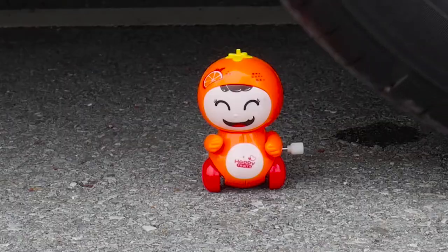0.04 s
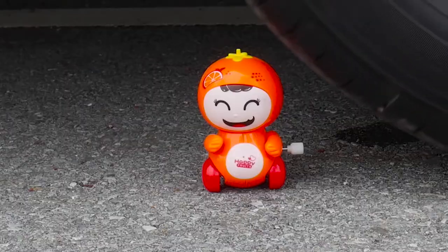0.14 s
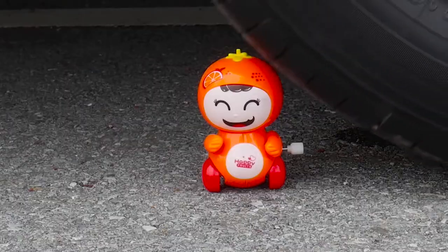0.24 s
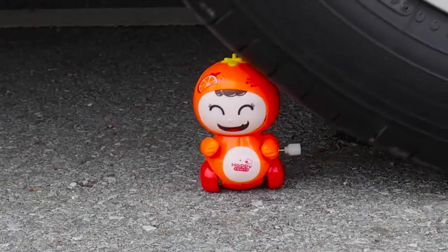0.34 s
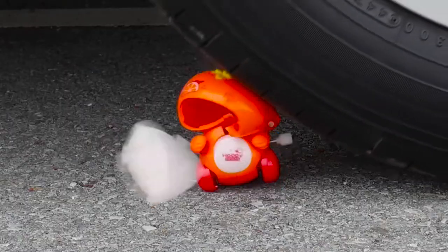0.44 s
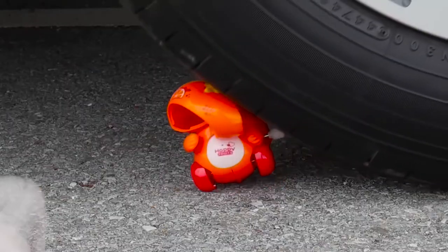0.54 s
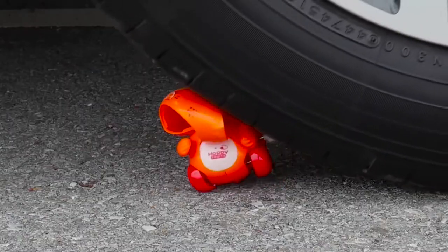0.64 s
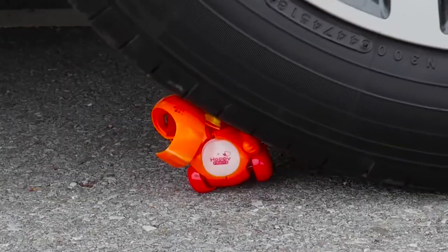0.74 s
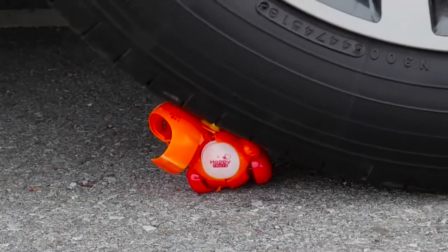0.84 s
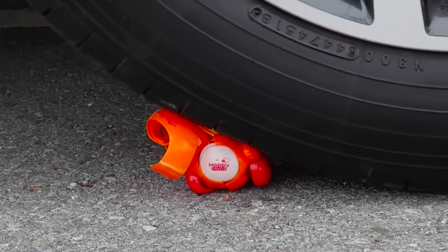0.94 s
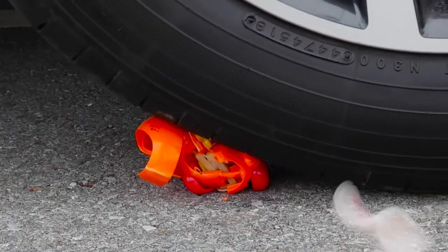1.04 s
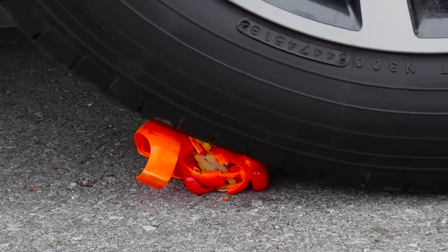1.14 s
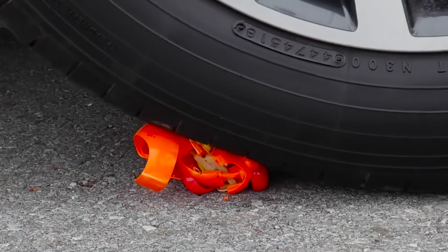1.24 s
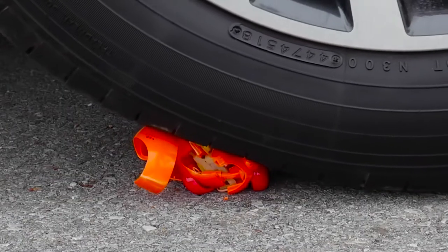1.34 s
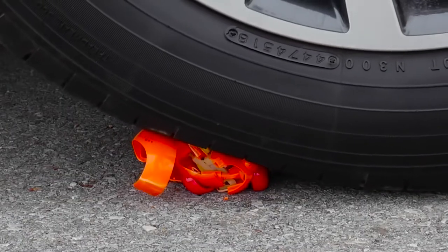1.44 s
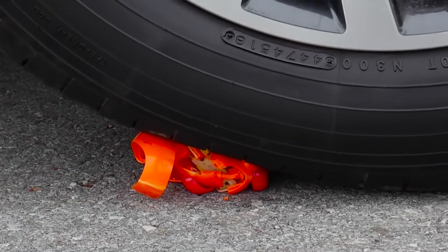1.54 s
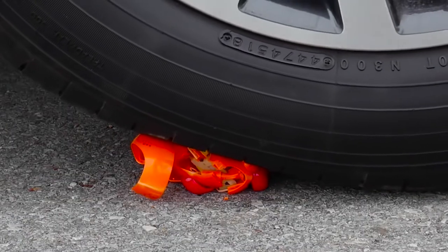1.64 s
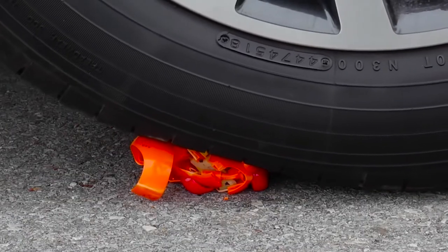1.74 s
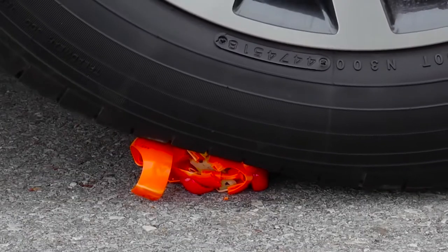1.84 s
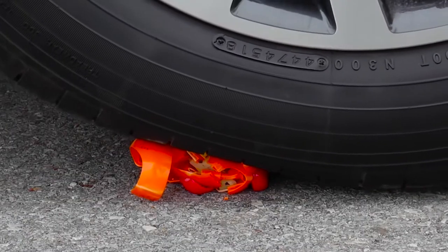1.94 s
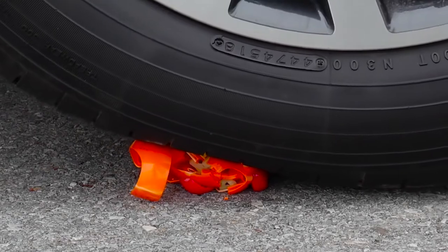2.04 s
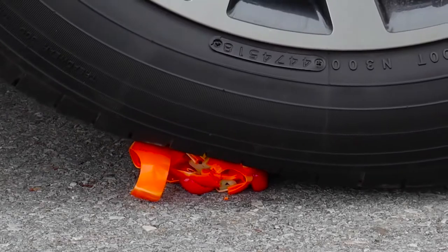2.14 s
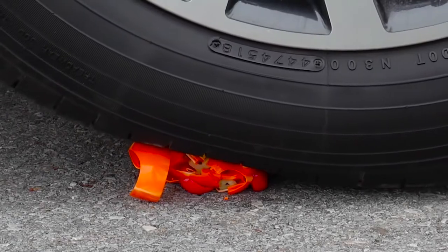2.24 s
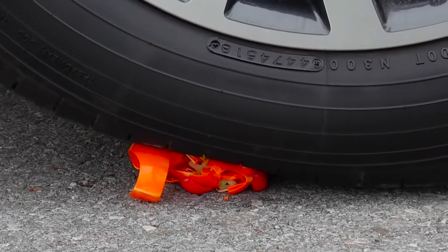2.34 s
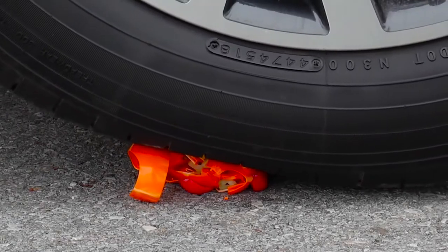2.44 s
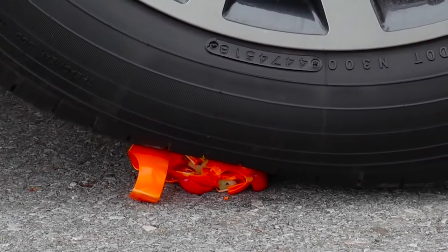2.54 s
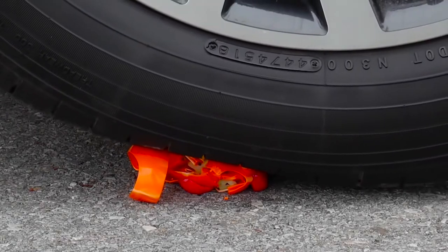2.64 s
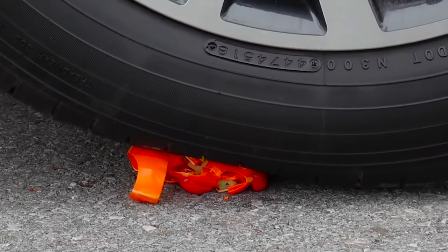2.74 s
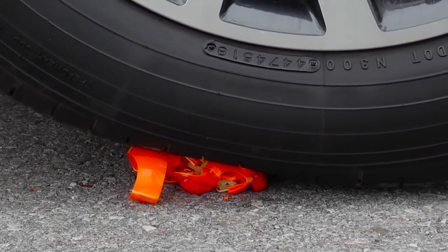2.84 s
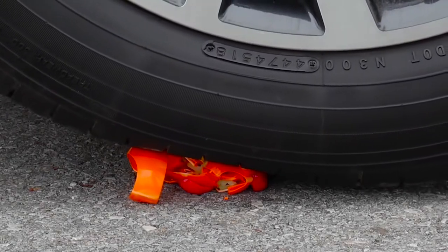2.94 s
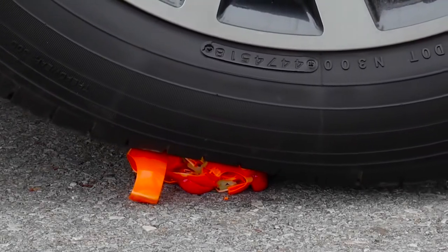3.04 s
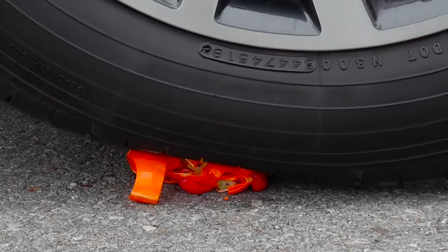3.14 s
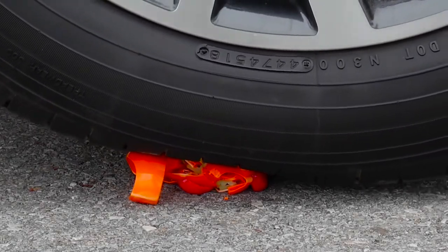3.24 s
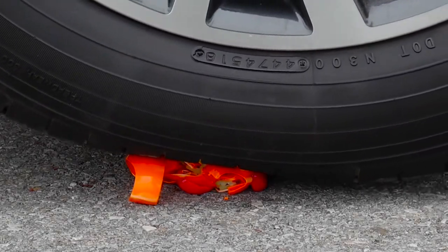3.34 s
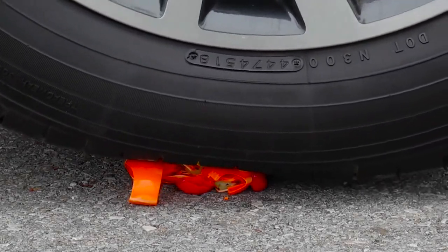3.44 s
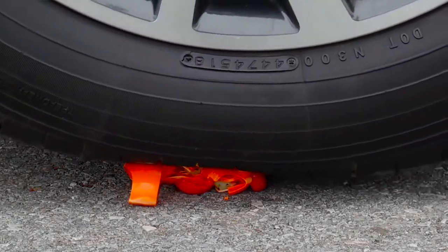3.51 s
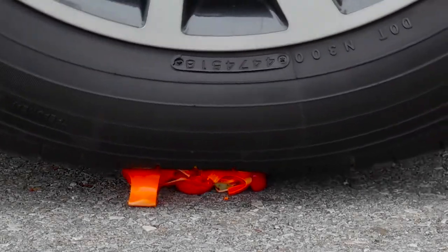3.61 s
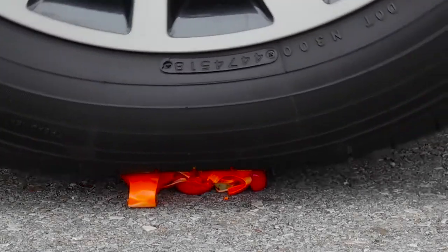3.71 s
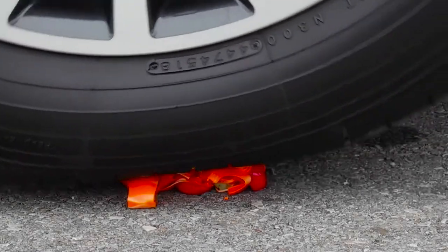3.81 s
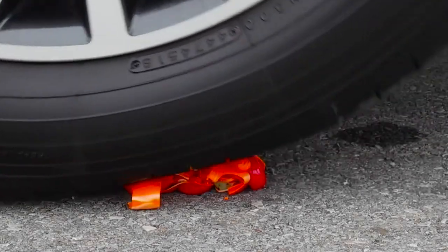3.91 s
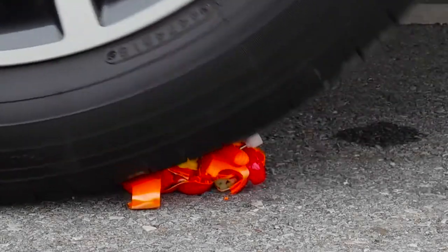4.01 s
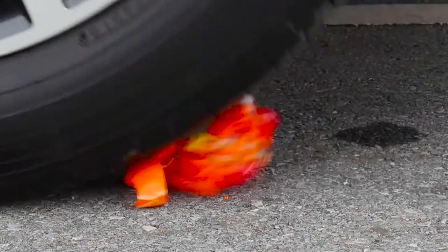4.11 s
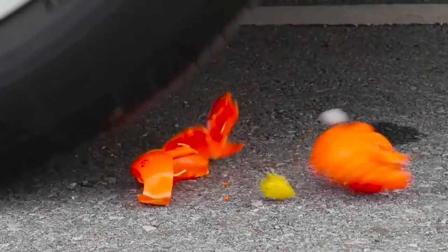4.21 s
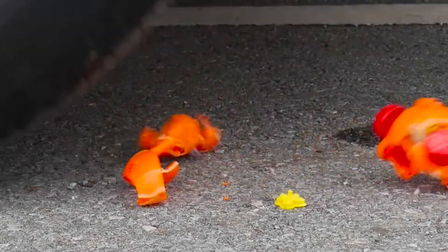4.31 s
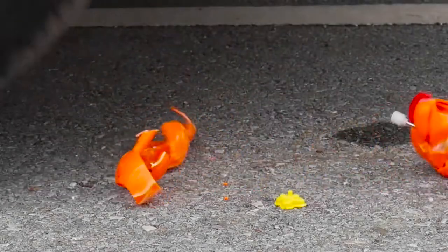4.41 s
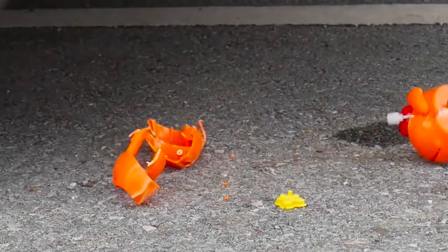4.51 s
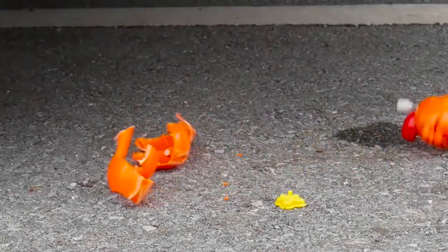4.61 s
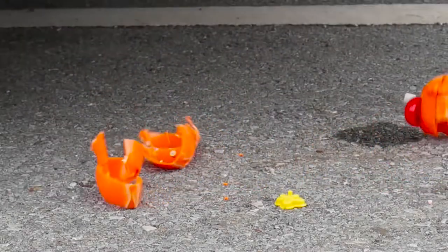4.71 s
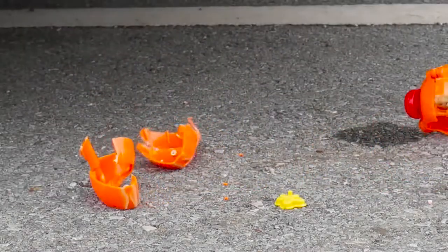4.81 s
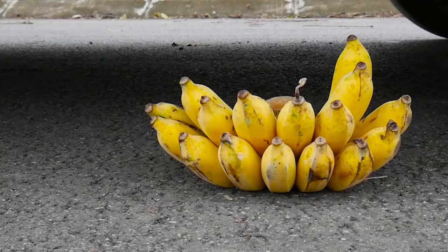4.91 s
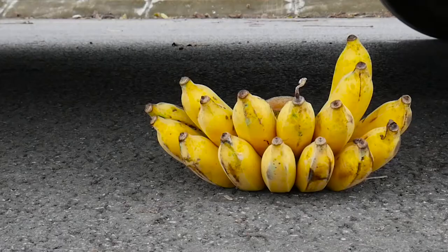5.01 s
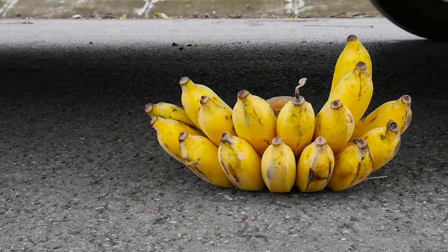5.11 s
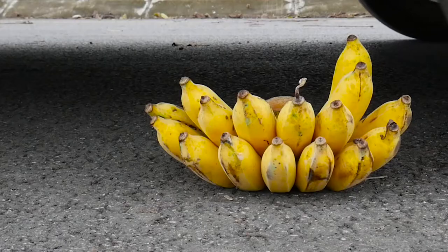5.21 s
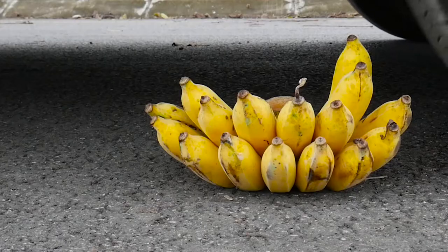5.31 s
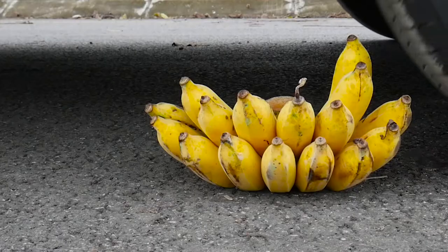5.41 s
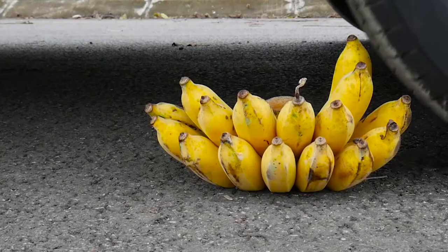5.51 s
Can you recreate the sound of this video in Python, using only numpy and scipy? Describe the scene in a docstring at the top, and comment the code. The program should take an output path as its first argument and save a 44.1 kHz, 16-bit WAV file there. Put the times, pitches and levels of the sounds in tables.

```python
"""Tyre over a hollow plastic toy

A car tyre rolls slowly over a plastic shell on asphalt, close by. Cracks are noise bursts that ring the shell's
modes, with brief echoes under the car; creaks are near-even slips, squeaks wavering sines. Grinding and skittering
shards are random grains through broad rings. The tyre's air hums as two sines over low rolling noise; the idling
car hisses behind as flickering noise bands with a faint tone, at a volume with abrupt steps."""
import sys
import numpy as np
from scipy import signal
from scipy.io import wavfile
from scipy.ndimage import uniform_filter1d

SR = 44100
rng = np.random.default_rng(int(sys.argv[2]) if len(sys.argv) > 2 else 0)


def unload_wav(signal):
    """Save mono or channel-first audio to the path in sys.argv[1] as 16-bit WAV at rate SR, clipped to [-1, 1]."""
    wavfile.write(
        sys.argv[1],
        SR,
        np.round(np.clip(np.atleast_2d(signal).T, -1, 1) * 32767).astype(np.int16),
    )


N = 245195
T_S = np.arange(N) / SR

# cracks and shard taps: (time [s], tearing time [ms], hollow [dB], wall [dB], rib [dB], splinter [dB],
# low ring [Hz], high ring [Hz])
CRACKS = [(0.352, 4.8, -63, -67, -43.5, -46, 740, 4700), (0.4173, 1.23, -15, -19, -6.5, 1.5, 690, 7086),
          (.435, 0.56, -29, -25, -36, -41, 790, 3500), (0.4731, 1, -8.5, -3.5, -0.5, 2, 1790, 3940),
          (0.4834, 0.14, -35, -5.5, 0, 5.5, 1810, 4130), (.49, 1.4, -38, -28, -6.5, -12.5, 1580, 5140),
          (0.505, 1.04, -18.5, -10, -13, -4.5, 1540, 10040), (0.519, 1.9, -48, -45, -23, -24, 1410, 4720),
          (0.524, 2, -49, -44, -33, -23, 2130, 7320), (0.5512, 1.3, -40, -17.5, -10.5, -6.5, 1290, 8800),
          (.5617, 0.36, -28, -16, -6.5, -6.5, 2070, 3900),
          (0.6246, 1.2, -45, -22, -17.5, -9.5, 2220, 10400), (.702, 1.6, -26, -13, -11.5, -11, 1600, 4180),
          (.7414, 2.9, -28, -32, -26, -18, 670, 4720), (0.7539, 4.1, -24, -41, -21, -28, 2550, 4500),
          (.762, 2.2, -18.5, -13, -2, -3, 2710, 4270), (0.8401, 0.73, -33, -23.5, -13.5, -16, 1590, 4300),
          (.858, 2.1, -24, -24.5, -20, -21, 620, 4390), (.91, 3.3, -55, -61, -40, -34.5, 370, 9900),
          (0.9998, 15, -36.5, -35, -30.5, -47, 1310, 6700),
          (1.0132, 0.43, -22.5, -35.5, -9, -2.5, 1000, 9830),
          (1.0203, 1.9, -40.5, -23, -16.5, -8, 2510, 9970), (1.027, 0.66, -28.5, -38, -11, -6, 1510, 9540),
          (1.047, .51, -36, -27, -21, -18.5, 2620, 8300), (1.0707, 1.8, -25, -21, -15.5, -7, 1660, 9740),
          (1.075, 1.07, -21, -2.5, 4.5, 3, 1950, 3910), (1.08, 1.2, -22.5, -26, -5, -6.5, 2050, 8750),
          (1.094, 1.2, -13, -23, -9.5, -6.5, 540, 4260), (1.102, 0.85, -34, -31, -15, -16, 560, 4570),
          (1.173, 2.5, -61, -70, -62, -40, 400, 8830), (1.1907, 3.2, -64, -66, -47, -33, 2140, 9100),
          (1.206, 5.5, -52, -47, -37, -35, 990, 4800), (1.216, 2.3, -28, -42, -25.5, -28, 540, 4380),
          (1.259, 0.17, -48, -58, -17.5, -19, 2720, 6000), (1.31, 3.5, -59, -67.5, -55, -39, 1090, 9150),
          (1.3636, 5.2, -48, -45.5, -50, -20.5, 760, 12000),
          (1.45, 6.4, -53.5, -44.5, -34.5, -29.5, 970, 9200), (1.47, 0.68, -24, -32, -5, -12.5, 580, 4400),
          (1.481, 0.16, -32.5, -27.5, -27.5, -34.5, 1110, 4430),
          (1.5, 2.4, -52.5, -47, -46.5, -29, 610, 10800), (1.521, 3, -52, -52, -44, -40, 800, 6800),
          (1.6054, 2.4, -49, -52, -41.5, -40, 720, 6330), (1.6744, 3.1, -48, -52, -41, -51, 745, 3500),
          (1.6985, 0.81, -34.5, -30.5, -10.5, -6, 560, 10700),
          (1.8797, 1.16, -46, -37, -23.5, -11.5, 750, 10900),
          (2.1478, .79, -15.5, -21, -10.5, -1.5, 570, 11200),
          (2.216, 0.86, -67, -61.5, -60, -42.5, 791, 11600),
          (2.2323, 0.37, -29, -23, -7.5, -11, 2710, 5070), (2.5, 1.3, -64, -56.5, -58.5, -50.5, 1300, 9260),
          (2.8182, 1.24, -12, -10.5, -5.5, -5.5, 480, 4230),
          (3.4251, 1.37, -20, -25, -18.5, -4.5, 550, 9450), (3.44, 3.2, -32, -38, -49, -46, 810, 4630),
          (3.4656, 0.7, -29.5, -27, -16.5, -3, 570, 11100), (3.5312, 0.5, -12, -23.5, -8, -10, 550, 7040),
          (3.638, 0.81, -11, -9.5, -0.5, -1.5, 800, 4330),
          (3.6563, 0.39, -15.5, -28, -12.5, -18, 800, 10300),
          (3.6753, 0.36, -31.5, -26.5, -38, -9.5, 550, 6290),
          (3.6866, .7, -18.5, -35, -20.5, -39, 760, 4600),
          (3.693, .88, -19.5, -48, -14.5, -11.5, 800, 10000), (3.708, 0.83, -35, -35, -26, -13, 570, 7250),
          (3.7161, 0.84, -14.5, -24.5, -22, -23, 800, 8910), (3.7479, 1.33, -8, -21, -4, -5.5, 820, 4520),
          (3.7666, 0.25, -31, -55, -18, -12.5, 700, 7990), (3.7866, 1, -24, -29, -17.5, -21.5, 790, 4850),
          (3.8215, 0.52, -24.5, -33, -24.5, -15.5, 790, 8500),
          (3.8554, 0.84, -10, -21.5, -7, -5.5, 760, 7980),
          (3.8995, 0.14, -25, -45.5, -20.5, -28, 800, 5060),
          (3.949, 0.67, -35.5, -33, -10.5, -10, 2570, 3630), (3.9585, 0.86, -8, -14, -6.5, -5, 550, 10830),
          (3.9718, 4.8, -34.5, -45, -29, -37.5, 530, 4820),
          (4.0198, 2.2, -46.5, -60.5, -52.5, -26, 590, 12700), (4.0536, 0.5, -48, -53, -36, -36, 670, 7040),
          (4.0743, 0.79, -48.5, -52, -38, -42, 780, 5000), (4.0876, 0.2, -29.5, -41.5, -46, -10, 760, 9400),
          (4.1046, 4.3, -33.5, -38, -18.5, -16.5, 1020, 10200),
          (4.112, 1.9, -29, -27.5, -31, -28.5, 970, 5000),
          (4.1235, 0.4, -47, -36.5, -25.5, -22.5, 2530, 3700),
          (4.1314, 0.35, -38.5, -38, -24.5, -29, 2800, 5050),
          (4.1368, 0.46, -52, -46, -32, -19.5, 2670, 9600), (4.152, 0.9, -58, -41, -42, -41, 1580, 9000),
          (4.1665, 0.79, -33.5, -31, -10.5, -13.5, 2670, 6500),
          (4.174, 0.98, -52, -25, -17.5, -32, 2380, 6550), (4.1832, 0.78, -31, -32, -13, -18, 2560, 5100),
          (4.19, 5.2, -22.5, -23, -9, -10, 1860, 4600), (4.2062, 1.9, -50, -30, -16, -13.5, 930, 10570),
          (4.265, 4.4, -53.5, -45.5, -26, -24.5, 2580, 3830),
          (4.2933, 3.3, -56, -58, -30, -26, 1870, 10830), (4.3063, 1.3, -55, -48, -25.5, -19.5, 1850, 9860),
          (4.3198, 7, -44, -59, -36, -27, 790, 9410), (4.344, 10, -56, -41, -26, -27, 2800, 7400),
          (4.358, 1.5, -57, -50, -28, -28, 2470, 4080), (4.3789, 6.6, -64, -61, -26, -28, 2280, 3850),
          (4.4135, 4.1, -42.5, -44, -40, -29, 860, 9100), (4.431, 4.5, -56, -39, -26.5, -27.5, 1780, 4100),
          (4.4822, 3.3, -45.5, -44, -27, -35, 2650, 3920), (4.4999, 0.82, -59.5, -48, -46, -28, 2640, 9000),
          (4.5085, 3.5, -46, -46, -25, -23, 2680, 3390), (4.549, 6, -52.5, -71.5, -32.5, -33.5, 2760, 6540),
          (4.5866, 8.1, -50.5, -49, -30.5, -30, 2440, 7300),
          (4.6728, 1.2, -50.5, -52, -37, -34.5, 450, 11530), (4.7375, 2.7, -67, -68, -45.5, -53, 420, 3680)]
# echo under the car against the direct sound: hollow, wall, rib, splinter [dB]
ECHO_DB = [-9.5, -10, -14.5, -16.5]
# modes of each shell part: (frequency [Hz], 60 dB decay time [ms], relative level [dB])
HOLLOW_MODES = [(380, 1.4, -7), (583, 39, -3), (799, 11, 16.5), (980, 14, 11)]
WALL_MODES = [(1520, 8.7, 7.5), (1820, 9.2, 11.5), (2071, 7.2, 15), (2500, 6, -16.5)]
RIB_MODES = [(3750, 3.7, -23), (4207, 9, -0.5), (4868, 8.2, 4.5), (5322, 8.2, 1), (6525, 10, 3)]
SPLINTER_MODES = [(7530, 4.3, 5), (7870, 1, -5.5), (9140, 3.4, 3.5), (10196, 4.6, 4.5), (11060, 2.6, 6),
                  (11780, 3.6, 1.6), (15000, 1.5, 2.5), (15000, 0.85, -2)]
# limits of the four parts' bands: (frequency [Hz])
PART_EDGES_HZ = [250, 1200, 3000, 7000, 16000]
# stick-slip of shell on rubber: (time [s], slip rate [Hz], level [dB], top ring over the others [dB])
CREAK = [(.64, 164, -47, 6), (.655, 168.5, -51, -4), (.685, 200.8, -42.5, 10), (.71, 292, -33, -12),
         (.74, 285, -28.5, -15), (.758, 279, -20, -6), (.77, 290, -49.5, -4)]
# a pinched piece sings: (start [s], frequency [Hz], length [ms], level [dB])
SQUEAKS = [(1.362, 3600, 22, -40), (1.364, 12200, 26, -48)]
# continuous grinding under the tyre that rises and falls: (time [s], level [dB])
GRIND = [(.33, -72.5), (.41, -45), (.62, -43), (.82, -50.5), (.99, -58.5), (1.4, -57), (1.85, -58),
         (2.0, -74.5), (3.33, -72), (3.42, -49.5), (3.58, -65), (3.64, -41), (4.0, -54.5), (4.3, -66),
         (4.6, -54.5), (4.77, -69), (4.9, -78)]
# shell or shard slides: (start [s], hold [s], level [dB], treble over mids [dB])
SCRAPES = [(0.56, 0.018, -42.5, 6), (0.644, 0.093, -31.5, -6), (1.085, 0.02, -30, -1),
           (1.468, 0.085, -62, -5), (2.135, 0.062, -51.5, -17), (2.81, 0.04, -43, -19.5),
           (3.393, 0.05, -47, -33), (3.84, 0.017, -52, 10), (4.108, 0.013, -36.5, -12),
           (4.182, 0.019, -26, -13), (4.276, 0.03, -49, -12), (4.348, 0.041, -42.5, -4),
           (4.426, 0.019, -51, -8), (4.51, 0.023, -45.5, -2)]
# tyre air hums as the rubber flexes: (time at full level [s], hold [s], hum [dB], overtone over hum [dB])
TYRE_HUMS = [(.68, 0.07, -47, -11), (.9, 0.12, -42.5, -25), (1.1, 0.031, -48, -4), (1.25, .2, -51, -21.5),
             (2.87, 0.16, -59.5, -26.5), (3.55, .1, -51.5, -12), (3.8, 0.081, -49, -13.5),
             (4.04, 0.17, -49.5, -10)]
# low rolling noise: (time [s], level [dB])
RUMBLE = [(0, -92), (.4, -70.5), (1.9, -66), (2.0, -79), (2.8, -76), (3.0, -64.5), (4.2, -62), (4.65, -63),
          (4.75, -74.5), (4.93, -75.5), (4.97, -63), (5.56, -65)]
# body lurches: (time at full level [s], level [dB])
LURCHES = [(.56, -45.5), (0.848, -50.5), (1.12, -53), (3.45, -51)]
# background noise level, with abrupt volume edits: (time [s], level [dB])
BACKGROUND_LEVEL = [(0, -57.5), (.33, -59.5), (.36, -45), (1.2, -54), (1.6, -49.5), (1.89, -46.5),
                    (1.92, -57), (2.24, -48.5), (2.28, -61), (3.35, -50.5), (3.6, -43.5), (4.3, -56),
                    (4.66, -52.5), (4.72, -65), (4.93, -64), (4.96, -55), (5.56, -55.5)]
# background spectrum: (frequency [Hz], relative level per Hz [dB])
CAR_SPECTRUM = [(25, -18.5), (60, -8.5), (120, -1.5), (300, -9), (550, -2), (900, -6), (1500, -13.5),
                (2400, -16), (4500, -23), (9000, -23.5), (16000, -32)]
# body resonances: (frequency [Hz], width [Hz], level over the wide noise [dB])
CAR_PEAKS = [(610, 26, -16.5), (745, 31, -14), (795, 140, -11), (1148, 250, -6.5), (1595, 20, -14),
             (3280, 750, -6.5)]
# faint engine-bay tone: (time [s], frequency [Hz])
WHINE = [(0, 747), (1.2, 731), (1.75, 774.7), (5.56, 780.5)]

PINNED_S, PINNED_ECHO_DB = 1.65, -4  # shell pinned flat under the rubber: drier cracks
FREE_S = 4.23  # tyre has rolled off
LONG_ECHO_DB = 2.5  # per tenfold tearing time
SHOVE_DB, SHARP_SHOVE_DB = -20, -19  # shove of air, against the hollow and the wall
GRIND_TILT_DB = -11.5  # treble over mids
SCRAPE_RISE_DB_S, SCRAPE_FALL_DB_S = 900.5, 701.5
SKITTER_S, SKITTER_ENDS_S, SKITTER_PER_S = 4.233, 4.81, 270
SKITTER_DB, SKITTER_FALL_DB_S, TAP_SPREAD_DB = -43.5, 40, 4.5
TYRE_HZ, OVERTONE_HZ = 199, 396
HUM_RISE_DB_S, HUM_FALL_DB_S, HUM_FLICKER_DB = 199.5, 60, 2.6
LURCH_RISE_DB_S, LURCH_FALL_DB_S = 95.5, 135
WHINE_FLICKER_DB, WHINE_ENDS_S = 2.5, 4.7
TOP_HZ = 16300


def undb(db):
    """Decibels to amplitude ratio."""
    return 10 ** (np.asarray(db) / 20)


def unit(x):
    """Scale to an RMS of 1."""
    return x / np.sqrt(np.mean(x ** 2))


def curve(table):
    """Columns after the time, interpolated to one value a sample."""
    s, *columns = np.transpose(table)
    return [np.interp(T_S, s, column) for column in columns]


def band(x, hz, width_hz):
    """Single resonance."""
    return signal.lfilter(*signal.iirpeak(hz, hz / width_hz, SR), x)


def walk(rate_hz):
    """Random normal levels, rate_hz a second, joined by straight slopes."""
    hold = int(SR / rate_hz)
    levels = rng.standard_normal(N // hold + 1)
    return uniform_filter1d(np.repeat(levels, hold), hold)[:N]


def swell(s, hold_s, db, rise_db_s, fall_db_s):
    """Gain that climbs to its level, holds and dies away."""
    t = T_S - s
    return undb(db - rise_db_s * np.maximum(-t, 0) - fall_db_s * np.maximum(t - hold_s, 0))


def ring(modes, t):
    """Sum of exponentially decaying modes."""
    hz, t60_ms, db = np.transpose(modes)[:, :, None]
    decay = 10 ** (-3000 * t / t60_ms)
    return np.sum(undb(db) * np.sin(2 * np.pi * hz * t) * decay, axis=0)


def part_modes(modes, shake, edge, own):
    """One part's modes, randomly shifted for a crack, plus the broken piece's rings in its band."""
    shaken = [(hz * (1 + 0.053 * a), t60_ms, db + b) for (hz, t60_ms, db), (a, b) in zip(modes, shake)]
    return shaken + [mode for mode in own if edge[0] <= mode[0] < edge[1]]


def cracks():
    """Each crack is a quick run of tiny tears that rings the shell's parts, then scatters under the car."""
    out, size = np.zeros(N + 8192), 6144
    t = np.arange(size) / SR
    parts = (HOLLOW_MODES, WALL_MODES, RIB_MODES, SPLINTER_MODES)
    edges = list(zip(PART_EDGES_HZ, PART_EDGES_HZ[1:]))
    filters = [signal.butter(2, edge, "bandpass", fs=SR, output="sos") for edge in edges]
    # echoes between road and floor pan: dense for a moment, then a faint tail
    tail = np.exp(-(t / 0.018) ** 1.5) + undb(-22.5) * 10 ** (-3 * t / 0.15)
    scatter = unit((1 - np.exp(-t / 0.006)) * tail)
    dull = signal.butter(1, 9000, fs=SR)  # rough asphalt swallows the top
    shove = unit(np.exp(-t / 0.0012) * np.sin(2 * np.pi * 80 * t))
    for s, tear_ms, *parts_db, low_hz, high_hz in CRACKS:
        tear_ms = max(tear_ms, 0.2)
        tears, echoes = rng.standard_normal((2, size))
        shakes = rng.standard_normal((4, 9, 2))
        tears = tears * np.abs(tears) ** 0.5  # uneven sizes
        tears = tears * np.exp(-(1000 * t / tear_ms) ** 0.95) * (1 - np.exp(-t / 0.00045))
        echoes = signal.lfilter(*dull, echoes)
        # a piece off the rubber rings longer
        own = [(low_hz, 16, 9), (high_hz, 14 if s > FREE_S else 8, 12)]
        sound = (undb(parts_db[0] + SHOVE_DB) + undb(parts_db[1] + SHARP_SHOVE_DB)) * shove
        wet_db = LONG_ECHO_DB * np.log10(tear_ms) + PINNED_ECHO_DB * (PINNED_S < s < FREE_S)
        for modes, edge, sos, db, echo_db, shake in zip(parts, edges, filters, parts_db, ECHO_DB, shakes):
            response = ring(part_modes(modes, shake, edge, own), t[:2048])
            rung = 0.7 * unit(signal.fftconvolve(tears[:1024], response))
            rung = np.pad(rung, (0, size - len(rung)))
            direct = unit(signal.sosfilt(sos, rung + 0.17 * unit(tears)))
            echo = unit(signal.sosfilt(sos, echoes)) * scatter
            sound = sound + undb(db) * (direct + undb(echo_db + wet_db) * echo)
        i = int(s * SR)
        out[i:i + size] += sound * np.sqrt(0.002 * SR / size)  # level is RMS as if spread over 2 ms
    return out[:N]


def creak():
    """Nearly even slips, each a short scratch in three rings of the bent shell."""
    slip_hz, db, tilt_db = curve(CREAK)
    phase = np.cumsum(slip_hz * (1 + 0.05 * walk(150)) / SR)
    slips = np.diff(np.floor(phase), prepend=0) * undb(1.5 * walk(200))
    scratch = signal.lfilter([1], [1, -np.exp(-1 / (0.0004 * SR))], slips)
    scratch = scratch * (1 + 0.6 * rng.standard_normal(N))
    rings = unit(band(scratch, 4730, 800) + 1.3 * band(scratch, 6500, 1000))
    rings = rings + undb(tilt_db) * unit(band(scratch, 11800, 3000))
    return rings * undb(db) * (T_S > CREAK[0][0]) * (T_S < CREAK[-1][0])


def squeak():
    """Short sines wavering in level and phase."""
    out = np.zeros(N)
    for s, hz, length_ms, db in SQUEAKS:
        tone = np.sin(2 * np.pi * hz * T_S + 0.72 * walk(192))
        arch = np.sin(np.pi * np.clip(1000 * (T_S - s) / length_ms, 0, 1) ** 0.72)
        out += undb(db + 2.7 * walk(300)) * tone * arch
    return out


def squeezed_shell(x, tilt_db):
    """Broad rings of the squeezed shell, damped by rubber."""
    mids = 0.5 * band(x, 1000, 840) + 0.38 * band(x, 2200, 2200) + band(x, 4000, 2100)
    treble = 1.4 * band(x, 6900, 2900) + band(band(x, 9700, 5000), 10000, 7000)
    return unit(mids) + undb(tilt_db) * unit(treble)


def grind():
    """Dense grains of uneven size over a noisy rub; scrapes stand out of it."""
    grains = (rng.random(N) < 2500 / SR) * undb(1.7 * rng.exponential(size=N)) * rng.choice([-1, 1], N)
    rub = 0.45 * rng.standard_normal(N)
    gains = [undb(curve(GRIND)[0]) * (T_S > GRIND[0][0])]
    gains += [swell(s, hold_s, db, SCRAPE_RISE_DB_S, SCRAPE_FALL_DB_S) for s, hold_s, db, _ in SCRAPES]
    total = sum(gains)
    # treble balance is weighted by the gain of each contact
    tilts = undb([GRIND_TILT_DB] + [row[-1] for row in SCRAPES])
    tilt_db = 20 * np.log10(tilts @ np.array(gains) / (total + 1e-9) + 1e-9)
    return squeezed_shell(unit(grains) + rub, tilt_db) * total * undb(3.5 * walk(110))


def skitter():
    """Random taps of small shards, each a brief bright rattle, fading as they roll off."""
    taps = (rng.random(N) < SKITTER_PER_S / SR) * undb(TAP_SPREAD_DB * rng.standard_normal(N))
    taps = taps * (T_S < SKITTER_ENDS_S)
    rattle = signal.lfilter([1], [1, -np.exp(-1 / (0.0017 * SR))], taps) * rng.standard_normal(N)
    bright = unit(band(rattle, 4100, 2600)) + 0.43 * unit(band(rattle, 9900, 5000))
    return bright * swell(SKITTER_S, 0.076, SKITTER_DB, SCRAPE_RISE_DB_S, SKITTER_FALL_DB_S)


def tyre():
    """The ring of air in the tyre hums with an overtone, wavering slightly."""
    hum = np.max([swell(s, hold_s, db, HUM_RISE_DB_S, HUM_FALL_DB_S)
                  for s, hold_s, db, _ in TYRE_HUMS], axis=0)
    overtone = np.max([swell(s, hold_s, db + over_db, HUM_RISE_DB_S, 2 * HUM_FALL_DB_S)
                       for s, hold_s, db, over_db in TYRE_HUMS], axis=0)
    waver = 2.9 * walk(11)
    out = np.zeros(N)
    for hz, gain, depth in ((TYRE_HZ, hum, 0.4), (OVERTONE_HZ, overtone, 0.8)):
        tone = np.sqrt(2) * np.sin(2 * np.pi * hz * T_S + waver * depth)
        out += tone * gain * undb(HUM_FLICKER_DB * walk(33))
    return out


def rumble():
    """Low rolling noise from tyre and body in two resonances, swelling at each lurch."""
    noise = rng.standard_normal(N)
    low = band(band(noise, 120, 77), 120, 77) + 0.19 * band(band(noise, 290, 150), 290, 150)
    lurch = sum(swell(s, 0.017, db, LURCH_RISE_DB_S, LURCH_FALL_DB_S) for s, db in LURCHES)
    return unit(low) * (undb(curve(RUMBLE)[0]) + lurch) * undb(0.83 * walk(14))


def car():
    """Engine-bay and street noise in separately flickering half-octave bands, body resonances and a tone."""
    table_hz, table_db = np.transpose(CAR_SPECTRUM)
    wide = np.zeros(N)
    for hz in 30 * 2 ** np.arange(0, 9.1, 0.5):
        db = np.interp(np.log(hz), np.log(table_hz), table_db) + 10 * np.log10(hz / 3)  # per Hz to per band
        noise = band(band(rng.standard_normal(N), hz, hz / 2), hz, hz / 2)
        wide += undb(db + 1.9 * walk(3)) * unit(noise)
    peaks = sum(undb(db + 2 * walk(44)) * unit(band(rng.standard_normal(N), hz, width_hz))
                for hz, width_hz, db in CAR_PEAKS)
    whine_hz = curve(WHINE)[0] + 6.6 * walk(22)
    whine = undb(-6 + WHINE_FLICKER_DB * walk(10)) * np.sin(2 * np.pi * np.cumsum(whine_hz) / SR)
    whine = whine * (T_S < WHINE_ENDS_S)
    return unit(unit(wide) + peaks + whine) * undb(curve(BACKGROUND_LEVEL)[0])


def scene():
    """All layers, alike in both channels."""
    mono = cracks() + creak() + squeak() + grind() + skitter() + tyre() + rumble() + car()
    return np.tile(mono, (2, 1))


def record(dry):
    """The loudest peaks clip; a faint random difference between the channels is added; the top is cut."""
    clipped = np.clip(dry, -0.78, 0.78)
    difference = undb(-23) * unit(walk(4000))
    stereo = clipped * (1 + difference * np.array([[1], [-1]]))
    top_cut = signal.ellip(12, 0.2, 90, TOP_HZ, fs=SR, output="sos")
    return signal.sosfilt(top_cut, stereo)


dry = scene()
out = record(dry)
unload_wav(out)
```